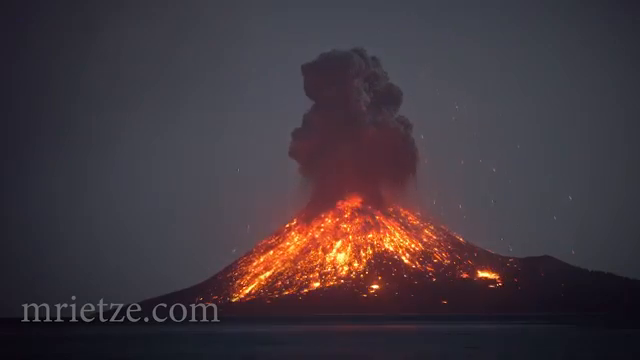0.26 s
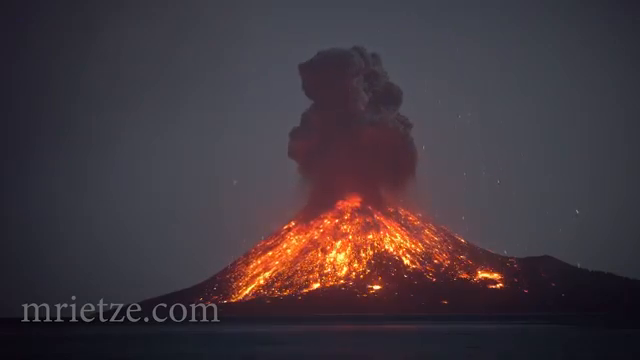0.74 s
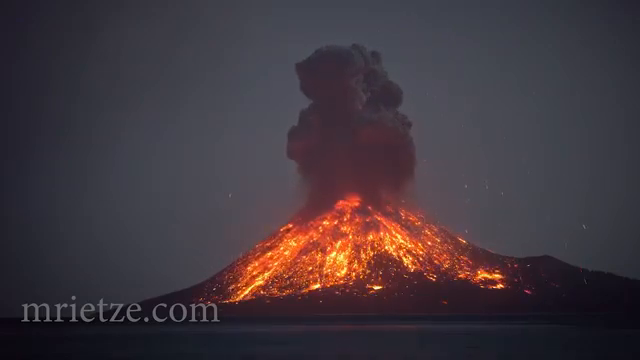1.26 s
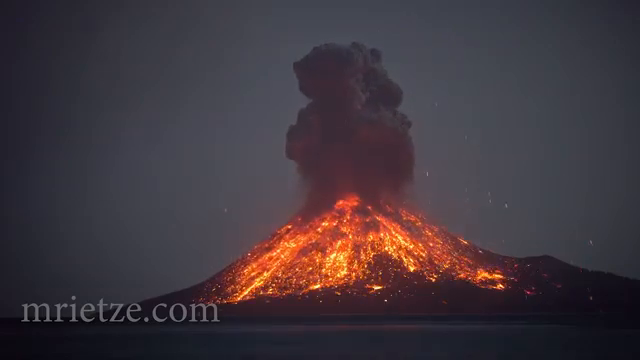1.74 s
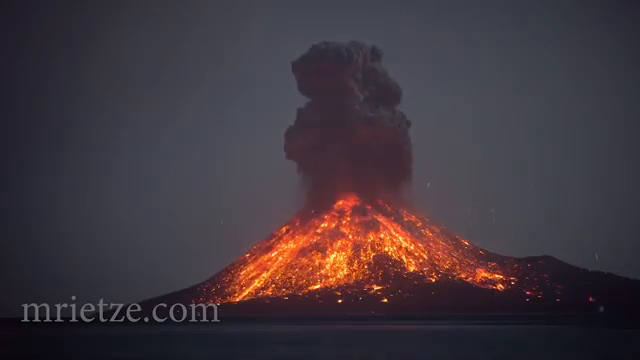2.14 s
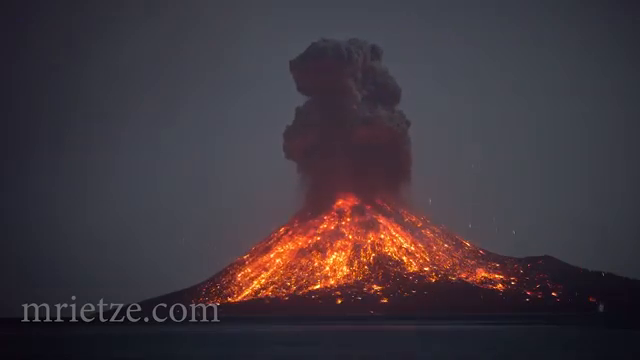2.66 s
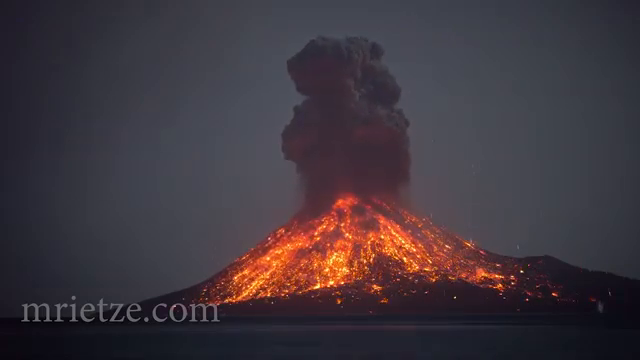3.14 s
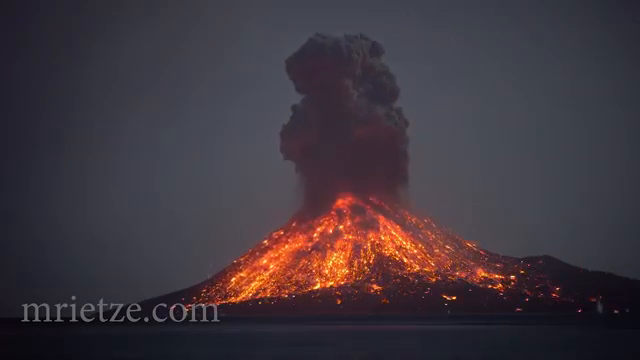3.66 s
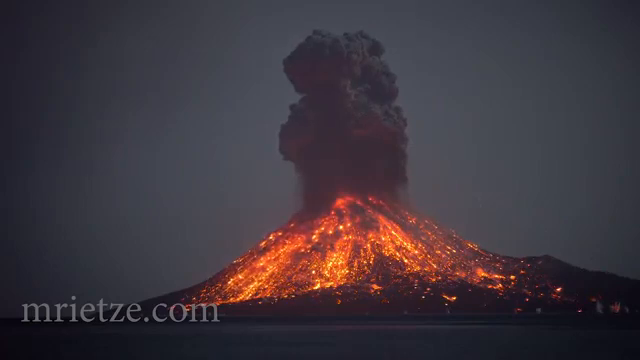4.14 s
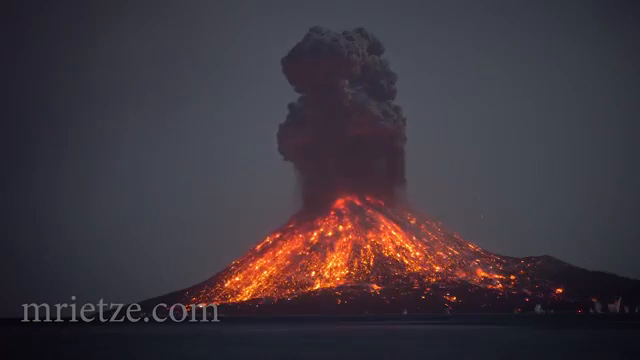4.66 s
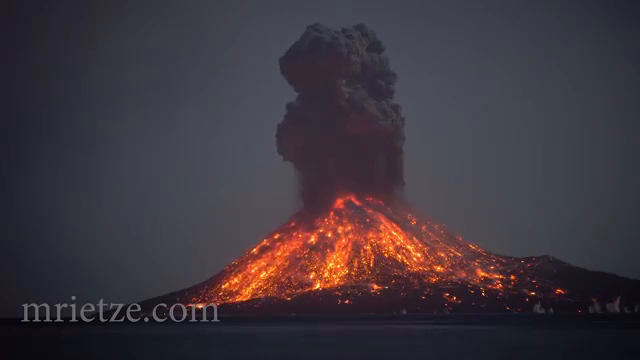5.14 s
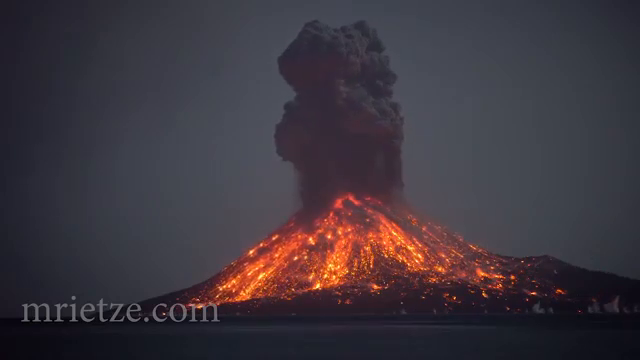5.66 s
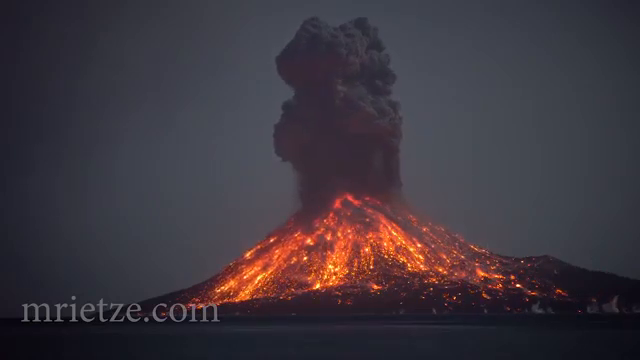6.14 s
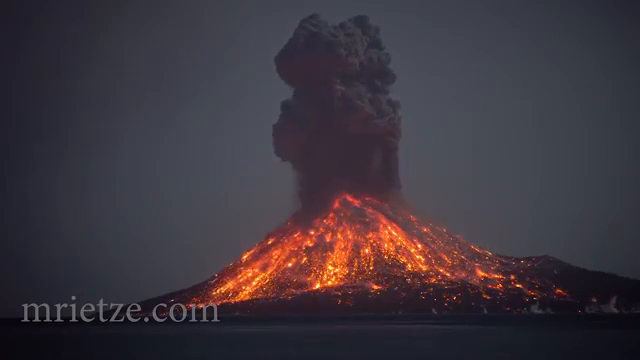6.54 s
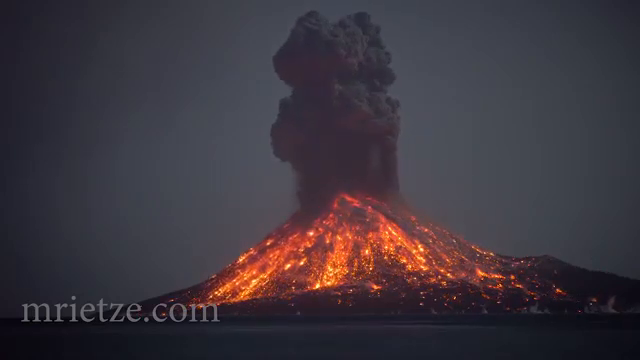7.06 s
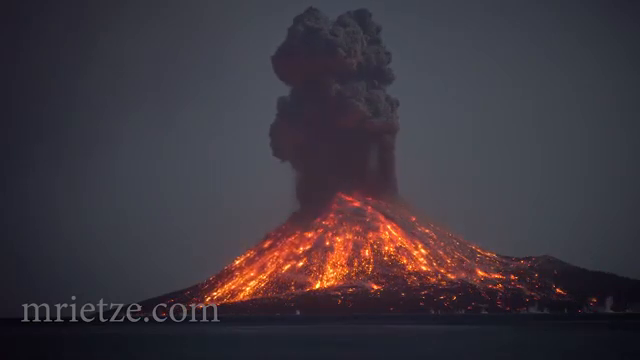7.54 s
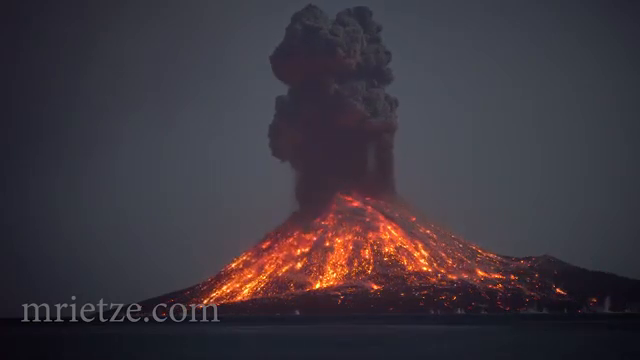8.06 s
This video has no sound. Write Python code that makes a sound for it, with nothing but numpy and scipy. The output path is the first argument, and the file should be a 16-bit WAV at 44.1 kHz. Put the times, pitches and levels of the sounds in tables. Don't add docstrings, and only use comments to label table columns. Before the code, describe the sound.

From 0 s a distant volcano gives a low rolling rumble, with muffled coughs and pressure thuds around 0.5-1 s. Soft surf recedes nearby; a faint cricket chirps in quick triple strokes about four times a second until 2.6 s, with a few higher chirps from another and a very faint far chorus. At 2.03 s a huge deep boom opens with a dull crack, heaves in several uneven thumps, rattles slightly and sinks by 2.6 s. From 2.6 to 3.04 s a dropout repeats sound from just before, including boom. Small water slaps on stones come at 3.3 s, crickets return faintly until about 4 s, and louder slaps hit at 4.2 and 4.5 s. Foamy breakers build, thumping at 5.3 s, with a low slap at 6.5 s. Another replayed patch spans 6.8-7.2 s. Low thuds follow, and the heaviest wave crashes around 8.1 s. Light microphone hiss throughout.

```python
import sys
import numpy as np
from scipy import signal
from scipy.fft import rfft, irfft, next_fast_len
from scipy.io import wavfile
from scipy.ndimage import uniform_filter1d, minimum_filter1d, map_coordinates

SR = 44100
rng = np.random.default_rng(int(sys.argv[2]) if len(sys.argv) > 2 else 0)


def transcribe(u):
    v = np.clip(np.atleast_2d(u).T, -1, 1)
    q = np.round(v * 32767).astype(np.int16)
    wavfile.write(sys.argv[1], SR, q)


def invert_db(level):
    return 10 ** (np.asarray(level, dtype=float) / 20)


N = 365588
TIME = np.arange(N) / SR


def unit(x):
    return x / np.sqrt(np.mean(x ** 2) + 1e-20)


def white():
    return rng.standard_normal(N)


def curves(rows):
    s, *cols = np.transpose(rows)
    return [np.interp(TIME, s, c) for c in cols]


def wobble(rate):
    knots = rng.standard_normal(int(N * 40 / SR) + 4)
    return map_coordinates(knots, [TIME * min(rate, 40)])


def swells(rows, width):
    return sum(invert_db(db) * np.exp(-((TIME - s) / width) ** 2) for s, db in rows)


def coloured(x, spectrum):
    m = next_fast_len(N + 8192)
    hz, db = np.transpose(spectrum)
    gain = invert_db(np.interp(np.log(np.fft.rfftfreq(m, 1 / SR) + 1), np.log(hz), db))
    return unit(irfft(rfft(x, m) * gain, m)[:N])


def rush(patchy_db):
    z = signal.stft(white(), nperseg=512)[2]
    field = uniform_filter1d(rng.standard_normal(z.shape), size=7, axis=0)
    field = uniform_filter1d(field, size=10, axis=1)
    return unit(signal.istft(z * invert_db(patchy_db * unit(field)), nperseg=512)[1][:N])


def grains(count, hz, spread, cycles, scatter_db, size):
    draw = rng.random((count, 3))
    pitch = hz * np.exp(spread * rng.standard_normal(count))[:, None]
    turns = pitch * np.arange(size) / SR
    shape = np.sin(2 * np.pi * turns * (1 + 0.078 * turns / cycles))
    shape *= invert_db(-60 * turns / (3 * cycles))
    level = invert_db(-scatter_db * np.log(draw[:, 1] + 0.0017))
    sign = np.sign(draw[:, 2] - .5)
    shape *= (level * sign)[:, None]
    at = (draw[:, :1] * N).astype(int) + np.arange(size)
    return unit(np.bincount(at.ravel(), shape.ravel(), N + size)[:N])


def add(x, s, piece):
    x[round(s * SR):][:len(piece)] += piece


FULL_DB = -25

# time in seconds, level in dB.
CRATER_ACTIVITY = [(0.0, -28.5), (0.5, -25.5), (0.67, -20), (0.84, -23), (1.68, -24), (1.85, -19.5),
                   (2.015, -23), (3.045, -17), (3.38, -26), (3.55, -25), (4.4, -27), (4.74, -24.5),
                   (5.4, -23), (5.7, -23.5), (6.77, -22.5), (7.215, -21), (7.57, -26.5), (8.28, -26)]
# time in seconds, level in dB.
BOOM_FORCE = [
    (2.026, -15),
    (2.083, -5),
    (2.141, -25),
    (2.256, -9.5),
    (2.313, -8.5),
    (2.37, -17),
    (2.485, -13),
    (2.543, -20.5),
    (2.6, -28),
]
# level in dB, growth in dB per dB of force.
BOOM_PARTS = [
    (-20, 0.28),
    (-32, 0.18),
    (-38.5, .05),
]
# time in seconds, level in dB.
COUGHS = [
    (.5, -31),
    (.75, -26),
    (.95, -29.5),
    (1.36, -33),
    (1.8, -32),
    (3.15, -33),
    (3.55, -35),
]
# frequency in Hz, level in dB per Hz.
RUMBLE_COLOUR = [(12, -29), (25, -14), (45, -8), (80, -1.5), (145, 2.5), (200, -10.5), (300, -29),
                 (500, -62), (1000, -120)]
# frequency in Hz, level in dB per Hz.
BODY_COLOUR = [(100, -37), (190, -1), (230, 0), (300, -3), (370, -5), (450, -11), (700, -31.5),
               (1500, -120)]
# frequency in Hz, level in dB per Hz.
CRACK_COLOUR = [(250, -44), (430, -2.5), (600, 1), (720, -2.5), (1000, -26.5), (1400, -22.5), (2500, -32),
                (5000, -120)]
# frequency in Hz, level in dB per Hz.
FOAM_COLOUR = [(300, -29.5), (600, -11), (780, -1), (960, 1), (1200, -6), (1500, -19), (3000, -90),
               (6000, -120)]


def volcano_rumble():
    (activity_db,), (force_db,) = curves(CRATER_ACTIVITY), curves(BOOM_FORCE)
    attack_s, fade_db_per_s, middle_db = .004, 19, -12
    boom = np.clip((TIME - BOOM_FORCE[0][0]) / attack_s + 1, 0, 1)
    boom = boom * invert_db(-fade_db_per_s * np.maximum(TIME - BOOM_FORCE[-1][0], 0))
    body, crack, rattle = (boom * invert_db(db + grows * (force_db - middle_db)) for db, grows in BOOM_PARTS)
    coughs = swells(COUGHS, width=0.099)
    body = body + coughs
    crack = crack + invert_db(-16) * coughs

    bursts = grains(count=2500, hz=110, spread=0.49, cycles=0.66, scatter_db=-1.0, size=1200)
    roar = rush(0.12) + 0.17 * coloured(bursts, [(20, 16), (100, 11), (500, 7)])
    lumps = wobble(12)
    above_db = activity_db - FULL_DB
    rumble_gain = np.hypot(invert_db(activity_db), boom * invert_db(force_db))
    body_gain = np.hypot(invert_db(-31 + 0.42 * above_db), body) * invert_db(lumps)
    crack_gain = np.hypot(invert_db(-44.5 + 0.22 * above_db), crack) * invert_db(0.28 * lumps)
    out = rumble_gain * coloured(roar, RUMBLE_COLOUR)
    out += body_gain * coloured(roar, BODY_COLOUR)
    out += crack_gain * coloured(roar, CRACK_COLOUR)
    return out + rattle * coloured(roar, FOAM_COLOUR)


# start in seconds, peak in dB, pitch in Hz.
BOOM_EDGE = [
    (2.027, -12, 590),
    (2.029, -12, 410),
    (2.033, -15, 680),
]
# start in seconds, peak in dB, pitch in Hz.
THUDS = [
    (.733, -10.5, 258),
    (2.136, -1, 254),
    (2.17, -12, 250),
    (2.344, -6, 382),
    (5.139, -8.5, 321),
    (7.958, -5, 353),
]
# start in seconds, peak in dB, pitch in Hz.
PUSHES = [(0.455, -8, 190), (0.655, -8, 130), (0.715, -10, 154), (0.775, -5, 145), (0.918, -1, 110),
          (1, -3, 102), (1.733, -6, 80.7), (2.022, 3.5, 99.6), (2.044, 3, 110), (2.093, 1, 128),
          (2.168, -1, 100), (2.188, -1.5, 88), (2.233, 3, 140), (2.26, 5.5, 88), (2.3, 0, 119),
          (2.325, -5, 175), (2.387, 0, 158), (2.46, 4, 155), (2.491, 3, 71), (2.535, 3.5, 85),
          (2.586, -8, 113), (3.123, -3.5, 161), (3.615, -12, 155), (5.14, -9, 91.5), (5.349, -8, 87),
          (5.64, -7, 95), (5.85, -8, 110), (7.301, -3, 51.1), (7.369, -4, 84)]


def volcano_pushes():
    out = np.zeros(N)
    t = np.arange(3500) / SR
    soft_front = 1 - np.exp(-t / .001)
    envelope = soft_front * invert_db(-60 * t / 0.11)
    sag_per_s = 1.75
    for s, db, hz in [*BOOM_EDGE, *THUDS, *PUSHES]:
        add(out, s, -invert_db(db - 5.5) * envelope * np.sin(2 * np.pi * hz * t * (1 - sag_per_s * t)))
    return out


# time in seconds, breaker strength in dB, run-up on the beach in dB.
WAVE_LEVELS = [(0.0, -36, -43.5), (0.4, -38.5, -45), (0.95, -40, -44.5), (2.0, -44, -44.6),
               (2.6, -47.5, -48), (3.045, -43.5, -51), (3.47, -38, -47.5), (4.1, -32.5, -44),
               (4.19, -31, -37.5), (4.59, -28, -35), (5.18, -27, -37), (5.5, -28.5, -40.5),
               (5.98, -22.5, -35), (6.77, -21.5, -33.5), (7.215, -25.5, -42), (7.43, -25, -40.5),
               (8.0, -20.5, -32.5), (8.28, -22.5, -33)]
# start in seconds, length in seconds, extra foam in dB.
HOLLOW_CRESTS = [
    (.15, .25, -3),
    (3.4, 0.59, 2),
    (4.33, 1.07, 3.5),
    (6.506, .4, 1),
    (8.06, .5, 4),
]
# time in seconds, level in dB.
LANDINGS = [
    (4.25, -33),
    (4.57, -32),
    (5.27, -27.5),
    (6.45, -36.5),
    (7.75, -32),
    (8.12, -23.5),
]
# frequency in Hz, level in dB per Hz.
CHURN_COLOUR = [(500, -77), (1150, -4.5), (1450, -0.5), (2000, -1), (2700, -4.5), (3500, -11), (7000, -39),
                (14000, -120)]
# frequency in Hz, level in dB per Hz.
WASH_COLOUR = [(1000, -34), (2500, -9), (3200, -6), (4500, -9), (6500, -15.5), (9000, -29.5), (14000, -120)]
# frequency in Hz, level in dB per Hz.
SPRAY_COLOUR = [(2000, -40), (5000, -10), (7500, -3), (8600, 1.5), (10200, -8), (13400, -10.5),
                (15000, -17.5), (20000, -35)]


def surf():
    breaker_db, runup_db = curves(WAVE_LEVELS)
    swell_db = breaker_db - FULL_DB
    edge_s = 0.055
    hollow_db = sum(db * np.clip(np.minimum(TIME - at, at + length - TIME) / edge_s, 0, 1)
                    for at, length, db in HOLLOW_CRESTS)
    wash_db = -29 + .6 * swell_db + 0.41 * (runup_db + 36.5)
    surge = .4 * wobble(6) + .45 * wobble(14) + .4 * wobble(30)

    bubbles = grains(count=7000, hz=1169, spread=0.476, cycles=2.64, scatter_db=2.0, size=400)
    froth = rush(0.85) + 0.29 * coloured(bubbles, [(400, 8.5), (1200, -5), (4000, 15.0)])
    fizz = grains(count=30000, hz=4900, spread=0.48, cycles=1.66, scatter_db=0.5, size=64)
    drops = rush(0.54) + 0.63 * fizz
    out = invert_db(-26 + 1.04 * swell_db + hollow_db + 0.5 * surge) * coloured(froth, FOAM_COLOUR)
    out += invert_db(breaker_db + 0.78 * surge) * coloured(froth, CHURN_COLOUR)
    out += invert_db(wash_db + 0.17 * surge) * coloured(drops, WASH_COLOUR)
    out += invert_db(runup_db + 0.9 + 1.4 * surge) * coloured(drops, SPRAY_COLOUR)

    landing = swells(LANDINGS, width=0.12)
    thump = invert_db(-42.5 + 0.94 * swell_db + hollow_db + 1.1 * wobble(12))
    weight = invert_db(-31.5 + 0.56 * swell_db + 2.75 * wobble(4))
    out += np.hypot(thump, invert_db(-7.5) * landing) * coloured(froth, CRACK_COLOUR)
    return out + np.hypot(weight, landing) * coloured(froth, BODY_COLOUR)


# start in seconds, peak in dB, pitch in Hz.
STONE_SLAPS = [
    (3.26, -16, 1230),
    (3.275, -11.5, 1490),
    (3.318, -27, 923),
    (4.162, -9, 1030),
    (4.245, -4, 896),
    (4.538, -3, 960),
    (6.512, -5, 751),
]


def stone_slaps():
    out = np.zeros(N)
    t = np.arange(900) / SR
    onset = 1 - np.exp(-t / .0006)
    for s, db, hz in STONE_SLAPS:
        noise = np.convolve(rng.standard_normal(len(t)), np.hanning(14) / 6.5, "same")
        splash = 1.1 * noise * invert_db(-60 * t / .03)
        ring = .6 * np.sin(2 * np.pi * hz * t) * invert_db(-60 * t / .02)
        add(out, s, invert_db(db - 4) * onset * (ring + splash))
    return out


def chirp(hz, fall_hz, bend, length):
    u = np.linspace(0, 1, int(length * SR))
    phase = 2 * np.pi * np.cumsum(hz - fall_hz * u ** bend) / SR
    ripple = 1 + .25 * np.sin(2 * np.pi * 75 * length * u)
    return np.sin(np.pi * u) ** .6 * ripple * np.sin(phase)


# start in seconds, peak in dB.
LOW_PHRASES = [(.15, -46), (.39, -40), (0.629, -40), (0.869, -35), (1.103, -39), (1.344, -36), (1.579, -34),
               (1.829, -33), (2.063, -34), (2.304, -38), (2.548, -39), (3.27, -47), (3.51, -48),
               (3.769, -46)]
# delay in seconds, level in dB, starting pitch in Hz.
WING_STROKES = [
    (0, 0, 6770),
    (.053, -1, 6720),
    (.106, -5.5, 6640),
]
# start in seconds, peak in dB.
HIGH_CHIRPS = [
    (0.9074, -41),
    (1.1303, -40),
    (3.5818, -46),
    (3.8044, -38),
    (4.0292, -37),
]
# frequency in Hz, level in dB per Hz.
CHORUS_COLOUR = [(5000, -120), (6200, -30), (6320, -12), (6480, -20), (6630, 0), (6780, -30), (8000, -120)]


def crickets():
    out = np.zeros(N)
    for s, db in LOW_PHRASES:
        for late, less, hz in WING_STROKES:
            stroke = chirp(hz=hz, fall_hz=250, bend=1.1, length=.034)
            add(out, s + late - .004, invert_db(db + less - 6.5) * stroke)
    for s, db in HIGH_CHIRPS:
        add(out, s - .003, invert_db(db + .3) * chirp(hz=7400, fall_hz=330, bend=3.5, length=.036))
    leaves = rng.standard_normal(SR // 8) * invert_db(-60 * np.arange(SR // 8) / SR / 0.35)
    smear = invert_db(-4.5) * signal.fftconvolve(out, leaves / np.linalg.norm(leaves))[:N]
    chorus = invert_db(-56 + 1.6 * wobble(18)) * coloured(white(), CHORUS_COLOUR)
    return out + smear + chorus


# frequency in Hz, level in dB per Hz.
HISS_COLOUR = [(100, -10), (3000, 0), (12000, -3), (15000, -2), (20000, -10)]


def microphone_hiss():
    return invert_db(-52.5) * coloured(white(), HISS_COLOUR)


def scene():
    volcano = volcano_rumble() + volcano_pushes()
    beach = surf() + stone_slaps()
    return (volcano + beach + crickets() + microphone_hiss())[None]


def top_cut(x):
    return signal.sosfilt(signal.butter(12, 15060, fs=SR, output="sos"), x)


# time in seconds, gain in dB, width in seconds.
GAIN_DUCKS = [
    (2.32, -2, .02),
    (2.55, -1.5, .02),
]
# start in seconds, end in seconds.
REPEATED_STRETCHES = [
    (2.603, 3.043),
    (6.77, 7.21),
]


def record(dry):
    dry = dry - uniform_filter1d(dry, size=3000)
    dry = dry * invert_db(sum(db * np.exp(-((TIME - s) / width) ** 4) for s, db, width in GAIN_DUCKS))
    need = np.minimum(1, invert_db(-.2) / (np.abs(dry) + 1e-9))
    limited = dry * uniform_filter1d(minimum_filter1d(need, size=900), size=600)
    repeated = np.zeros(N)
    for start, end in REPEATED_STRETCHES:
        repeated[round(start * SR):round(end * SR)] = 1
    repeated = uniform_filter1d(repeated, size=24)
    repeat_s = .64
    earlier = np.roll(limited, round(repeat_s * SR), axis=1)
    mix = (1 - repeated) * limited + repeated * earlier
    return top_cut(np.clip(mix, -1, 1))


dry = scene()
out = record(dry)
transcribe(out)
```